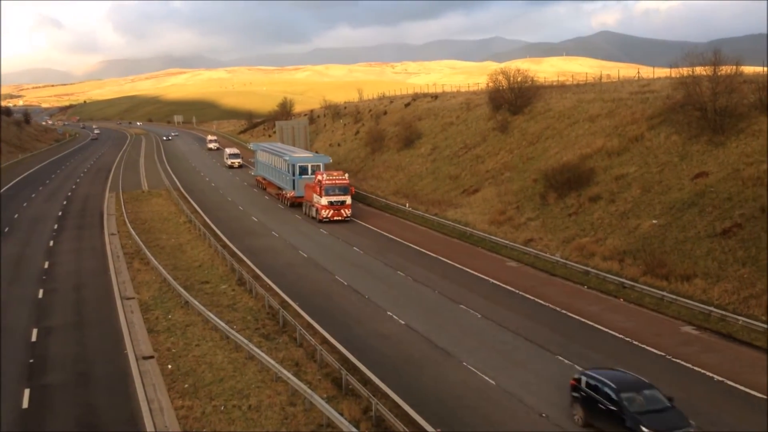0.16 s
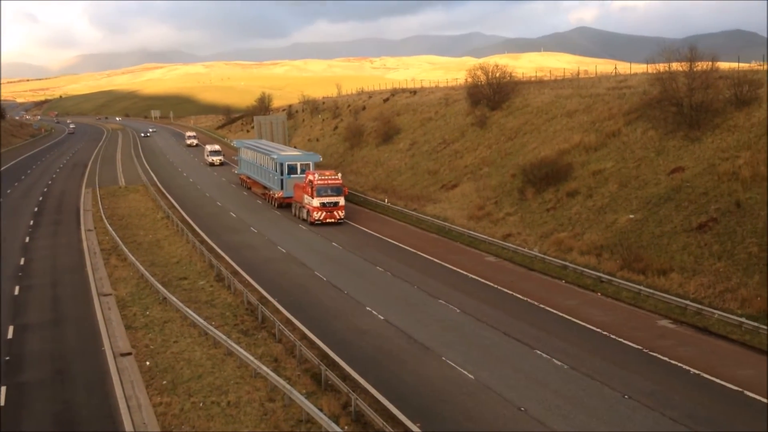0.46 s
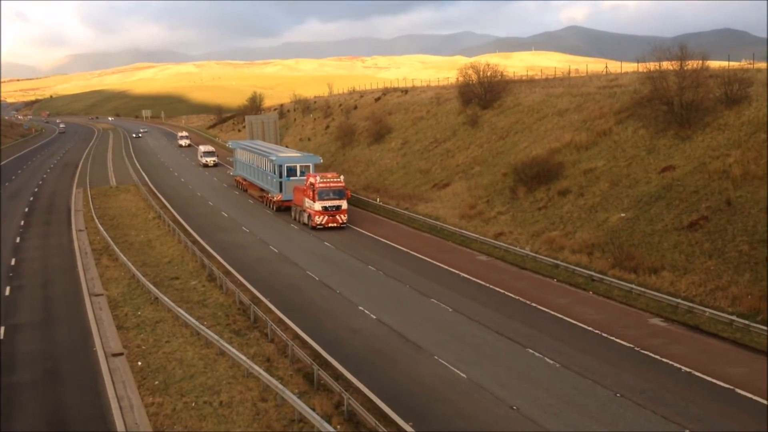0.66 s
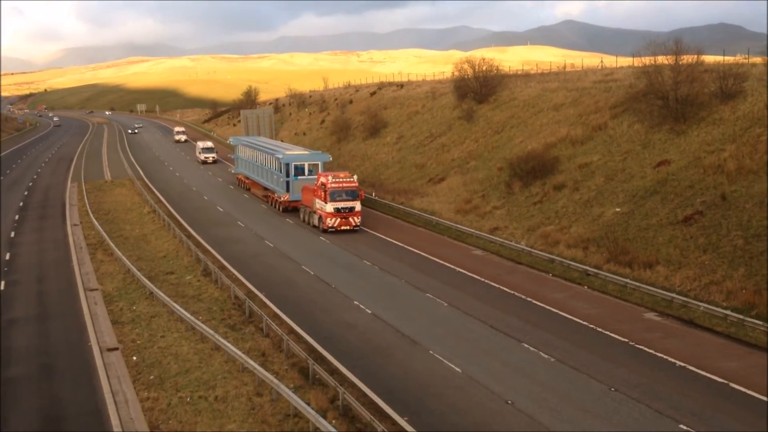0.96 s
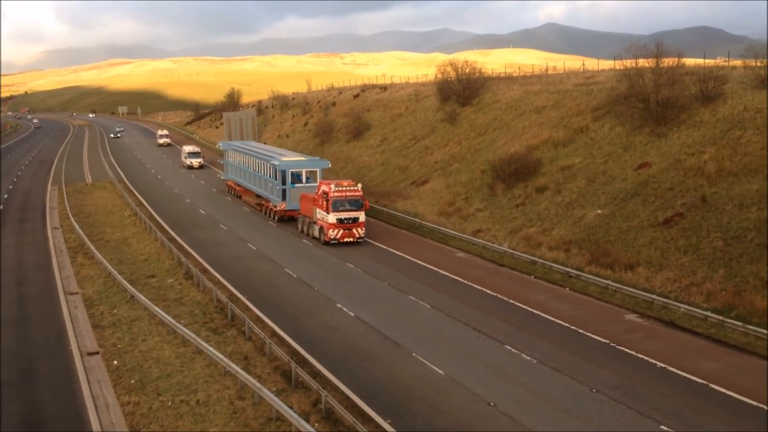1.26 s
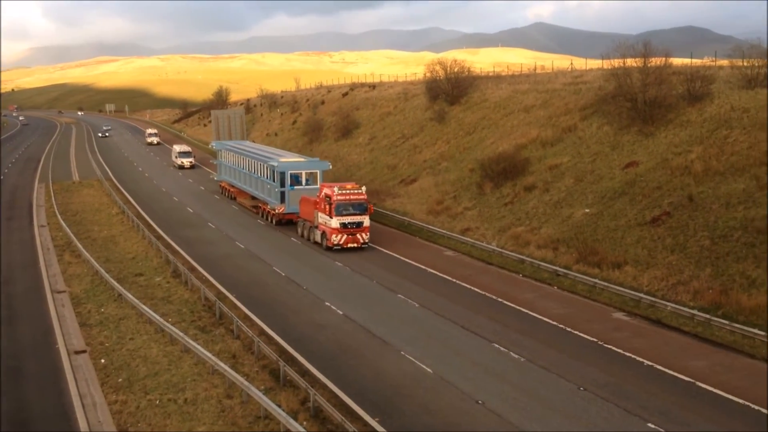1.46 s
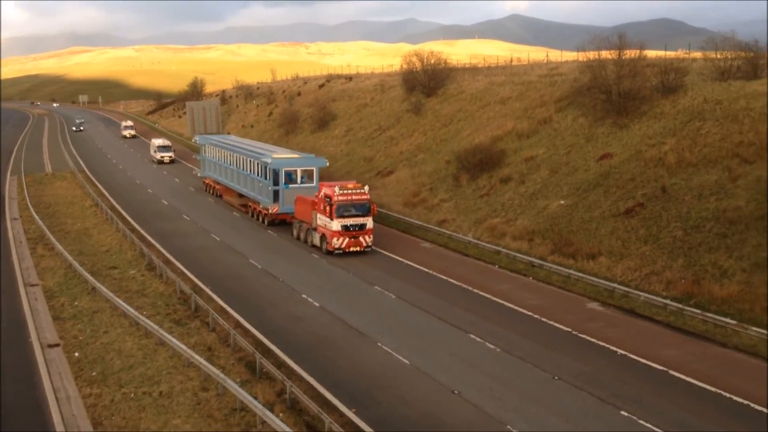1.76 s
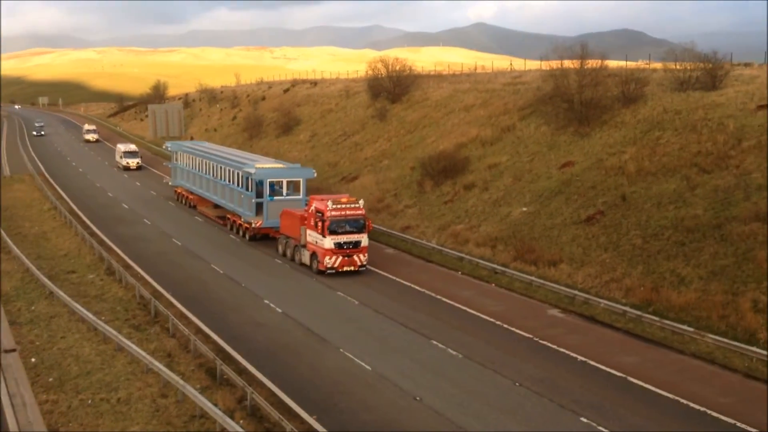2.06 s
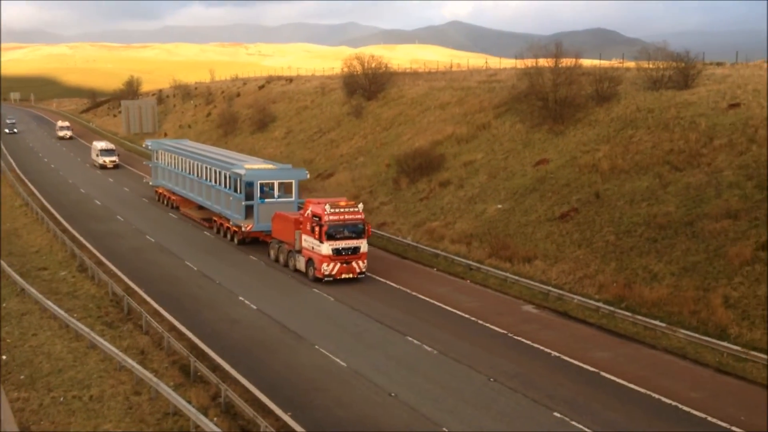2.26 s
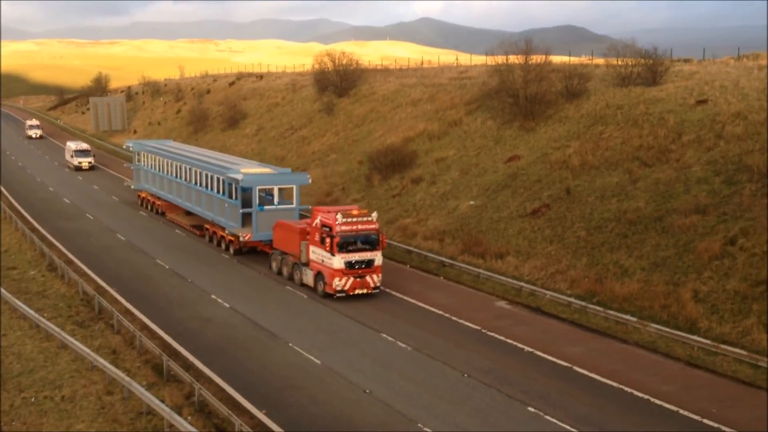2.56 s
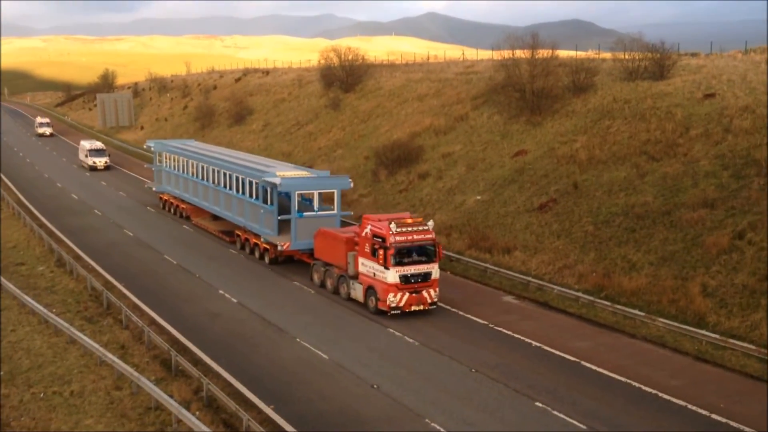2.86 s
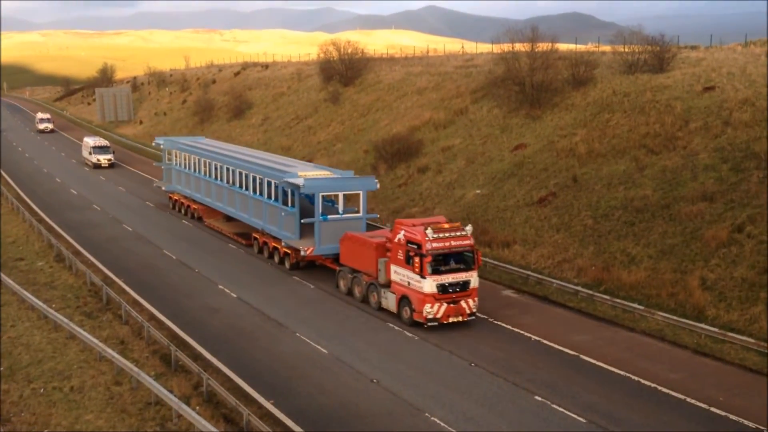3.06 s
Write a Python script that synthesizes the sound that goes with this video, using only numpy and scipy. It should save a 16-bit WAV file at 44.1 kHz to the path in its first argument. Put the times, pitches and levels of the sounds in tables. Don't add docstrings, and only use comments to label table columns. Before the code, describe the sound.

Two-tone truck horn blast on a motorway, between a car rushing past and the truck rumbling nearer

```python
import sys
import numpy as np
from scipy import signal
from scipy.fft import rfft, irfft, next_fast_len
from scipy.io import wavfile
from scipy.ndimage import uniform_filter1d, map_coordinates

SR = 44100
rng = np.random.default_rng(int(sys.argv[2]) if len(sys.argv) > 2 else 0)


def rack_gain(trim_db):
    fader = np.asarray(trim_db, float)
    return 10 ** (fader / 20)


def transcribe(u):
    v = np.clip(np.atleast_2d(u).T, -1, 1)
    q = np.round(v * 32767).astype(np.int16)
    wavfile.write(sys.argv[1], SR, q)


N = 142002

# time_s, level_db, deck_screening_0_to_1
CAR_PASS = [
    (0, -17.5, 0.1),
    (.3, -18.5, 0.02),
    (.55, -17.5, 0.09),
    (.7, -19.5, 0.1),
    (0.878, -21, 0.26),
    (1.0, -22, 0.73),
    (1.2, -27.5, 0.21),
    (1.5, -24, 0.6),
    (2.2, -39.5, 0.8),
]
# freq_hz, density_db
CAR_TYRE_SPECTRUM = [(90, -36), (300, -22.5), (600, -3.5), (1000, 1.2), (1600, -2.5), (2800, -24),
                     (7000, -26), (15000, -51)]
# centre_s, centre_hz, half_length_s, gain_db
TYRE_SWELLS = [(.13, 1150, .04, 4), (.25, 800, .06, 2), (.33, 1000, .04, -2), (.45, 820, .05, 4.5),
               (.63, 930, .07, 4.5), (.72, 850, .03, 3), (.82, 800, .05, 2.5), (.55, 1500, .14, -3),
               (.85, 1150, .08, -2.5), (.15, 4400, .12, 2.5), (.52, 4200, .1, 3), (.4, 3100, .13, -4),
               (.1, 2600, .08, 3)]
# time_s, nearness_db
TRUCK_NEARNESS = [(0, -5.5), (.6, -4), (1.0, -8), (1.3, -9.5), (1.6, -6.5), (1.9, 0.5), (2.2, -1.5),
                  (2.5, 1), (2.8, 3.5), (3.0, 6), (3.12, 6.5), (3.22, 5)]
# freq_hz, density_db
RUMBLE_SPECTRUM = [(25, -54), (65, -28), (80, -17.5), (120, -10), (200, 4), (300, -5.5), (450, -32),
                   (700, -52.5)]
# freq_hz, density_db
ROAR_SPECTRUM = [(150, -42), (350, -8.5), (580, 2.2), (1000, -4), (1600, -10.5), (2500, -17.5), (4000, -55),
                 (6000, -77)]
# freq_hz, density_db
HISS_SPECTRUM = [(1200, -26.5), (2200, 0), (3500, 2.5), (5500, -3.5), (8000, -8), (11000, -21.5),
                 (15000, -44)]
# time_s, pitch_hz
ENGINE_PITCH = [
    (0, 197.3),
    (1.0, 192.3),
    (1.8, 189.7),
    (2.2, 197.4),
    (2.6, 209.7),
    (3.0, 216),
    (3.22, 218.4),
]
# multiple, level_db
HIGH_PARTIALS = [(1, -14), (2, -28), (3, -8), (4, -8), (5, -2.5), (6, 2), (7, -8), (8, -13), (9, -26),
                 (10, -16), (11, -12.5), (12, -20), (13, -24.5), (14, -33)]
# multiple, level_db
LOW_PARTIALS = [(3, -19.5), (4, -13), (5, -13), (6, -14), (7, -30), (8, -17), (9, -18), (10, -22),
                (11, -22)]
# multiple, centre_s, half_length_s, gain_db
PARTIAL_FADES = [(3, 1.39, .05, -5), (3, 1.81, .04, 3), (4, 1.42, .07, 3), (4, 1.79, .05, -6),
                 (5, 1.52, .08, 2), (5, 1.755, .028, -12), (5, 1.81, .03, 1.5), (6, 1.41, .04, 1),
                 (6, 1.6, .09, -3), (7, 1.4, .035, 5), (7, 1.51, .05, -3), (7, 1.79, .05, 2),
                 (8, 1.39, .03, -4), (8, 1.52, .04, -7), (10, 1.6, .03, -5), (11, 1.44, .05, 2),
                 (11, 1.655, .04, -14), (12, 1.55, .03, 3), (13, 1.64, .03, -7)]
# freq_hz, density_db
JET_SPECTRUM = [(2500, -27), (4500, -1.5), (6500, 4), (8200, -10), (10500, -14), (13000, -24)]
# freq_hz, t60_s
BANK_DECAY = [(300, .3), (800, .17), (1100, .09), (1500, .1), (2100, .2), (4000, .04)]
# start_s, start_hz, end_s, end_hz, gain_db
PARAPET_NOTCHES = [(.05, 12400, .4, 10900, -9), (.1, 7300, .6, 5700, -4), (.3, 3400, .55, 2800, -8),
                   (.55, 2800, .78, 2600, -5), (.87, 5000, 1, 4950, -7), (2.2, 5000, 2.5, 5000, -6),
                   (0, 7800, .45, 6300, -4), (2.04, 2000, 2.2, 1300, -4), (.58, 13200, .95, 11800, -8),
                   (1.4, 8700, 1.85, 8500, -5), (1.89, 3700, 2.04, 2200, -10)]
# start_s, peak_db, pitch_hz
CAMERA_TICKS = [(1.824, -34, 8960), (1.86, -30, 6020), (1.8658, -25.5, 11800), (1.8697, -19.5, 6800),
                (1.87, -26, 4030), (1.869, -26, 13000), (2.14, -44, 5500), (2.15, -42, 6500),
                (1.902, -40.5, 4400), (1.874, -24.5, 4100), (1.8795, -37, 9850), (1.883, -33.5, 7000),
                (1.912, -41, 8000), (2.187, -28.5, 7500), (2.288, -35.5, 6000)]
# start_s, pitch_hz, peak_db, t60_s
CAMERA_THUMPS = [
    (2.255, 140, -21, .15),
    (2.31, 120, -24, .1),
    (3.008, 130, -20, .12),
    (2.43, 200, -19, .12),
    (2.89, 170, -19, .12),
    (3.012, 220, -17, .08),
    (3.01, 345, -11, .075),
    (3.18, 180, -14, .15),
    (3.198, 265, -11, .15),
]
# time_s, pitch_hz, level_db
STRAP_SQUEAKS = [
    [(2.134, 4590, -67), (2.14, 5500, -50), (2.145, 6800, -62), (2.15, 5400, -35), (2.157, 4370, -27.5),
     (2.166, 3500, -32), (2.178, 4200, -35), (2.192, 4500, -44), (2.2, 4600, -65)],
    [(2.158, 4900, -55), (2.166, 5500, -34), (2.18, 5850, -30), (2.189, 6300, -28.5), (2.196, 6500, -30),
     (2.2, 6300, -43), (2.215, 6300, -48), (2.225, 6300, -65)],
]
# centre_hz, width_hz, gain_db
MIC_RESONANCES = [
    (205, 36, -0.5),
    (414, 52, -2.5),
    (4450, 360, 5.5),
    (4900, 240, -7.5),
    (10400, 710, 3),
]
# centre_s, corner_hz, length_s, gain_db
DROPOUTS = [(.748, 2300, .016, -22), (1.005, 2600, .012, -25), (1.175, 2700, .012, -22),
            (1.249, 2650, .03, -70), (1.335, 2200, .031, -60), (1.625, 2800, .012, -18),
            (1.855, 5500, .016, -20), (2.007, 2100, .012, -17), (2.018, 4800, .008, -10),
            (2.134, 1900, .009, -18), (2.145, 5000, .005, -8), (2.71, 2300, .02, -16)]
# centre_s, pitch_hz, peak_db
DROPOUT_LINES = [(.748, 3251, -45), (.748, 4328, -43), (.748, 4629, -45), (1.172, 3251, -51),
                 (1.172, 4457, -56), (1.245, 2680, -48), (1.255, 4112, -53), (1.255, 4414, -53),
                 (1.33, 4700, -57), (1.335, 4328, -56), (1.338, 4511, -55), (1.338, 6503, -59),
                 (1.852, 5867, -53), (2.007, 3251, -45), (2.007, 4037, -46), (2.007, 6083, -54),
                 (2.13, 2497, -47), (2.13, 2939, -48), (2.13, 3789, -48), (2.13, 4112, -48),
                 (2.71, 3434, -41), (2.71, 3800, -45), (2.71, 4608, -49)]

HORN_ON_S, HORN_OFF_S, ATTACK_S = 1.3534, 1.812, 0.0355


def unit(x):
    return x / np.sqrt(np.mean(x ** 2) + 1e-20)


def bump(x):
    return np.exp(-x ** 2)


def along(points, hz):
    f, v = np.transpose(points)
    return np.interp(np.log(hz + 1), np.log(f + 1), v)


def curves(rows):
    s, *cols = np.transpose(rows)
    return [np.interp(np.arange(N) / SR, s, c) for c in cols]


def wobble(rate_hz):
    knots = rng.standard_normal(int(N * 100 / SR) + 4)
    return map_coordinates(knots, [np.arange(N) * min(rate_hz, 99) / SR])


def shaped(x, gain):
    hz, t, z = signal.stft(x, SR, nperseg=256, noverlap=192)
    return signal.istft(z * gain(hz[:, None], t[None]), SR, nperseg=256, noverlap=192)[1][:N]


def filtered(x, response):
    m = next_fast_len(N + SR // 2)
    return irfft(rfft(x, m) * response(np.fft.rfftfreq(m, 1 / SR)), m)[:N]


def rush(spectrum, patchy_db):
    z = signal.stft(rng.standard_normal(N), nperseg=512)[2]
    field = uniform_filter1d(rng.standard_normal(z.shape), size=5, axis=0)
    field = uniform_filter1d(field, size=10, axis=1)
    x = signal.istft(z * rack_gain(patchy_db * unit(field)), nperseg=512)[1][:N]
    return unit(filtered(x, lambda hz: rack_gain(along(spectrum, hz))))


def car():
    time_s, level_db, screening = np.transpose(CAR_PASS)
    doppler_db, doppler_s, doppler_width_s = 1.5, 0.18, 0.057
    swell_octaves = .28
    screen_hz, screen_db_per_octave = 2500, 11.5

    def path(hz, t):
        tilt = np.clip(np.log2((hz + 1) / 1100), -.6, .6) * (hz < 2400)
        db = np.interp(t, time_s, level_db)
        db = db - doppler_db * np.tanh((t - doppler_s) / doppler_width_s) * tilt
        for centre_s, centre_hz, half_s, gain_db in TYRE_SWELLS:
            octaves = np.log2((hz + 1) / centre_hz)
            db = db + gain_db * bump((t - centre_s) / half_s) * bump(octaves / swell_octaves)
        screen = np.interp(t, time_s, screening)
        return rack_gain(db - screen_db_per_octave * screen * np.log2(1 + hz / screen_hz))

    sway_db = .6 * wobble(12.87)
    return rack_gain(sway_db) * shaped(rush(CAR_TYRE_SPECTRUM, patchy_db=0.7), path)


def truck():
    near_db, = curves(TRUCK_NEARNESS)
    pitch_hz, = curves(ENGINE_PITCH)
    pitch_hz = pitch_hz * (1 + .012 * wobble(25))
    drone = np.sin(2 * np.pi * np.cumsum(pitch_hz) / SR)
    drone = rack_gain(-32 + 2 * wobble(5.66)) * drone
    rumble = rack_gain(-28.5 + 1.1 * wobble(6.98)) * rush(RUMBLE_SPECTRUM, patchy_db=-0.4)
    roar_db = -27.5 + 0.47 * near_db + 0.31 * wobble(8.6)
    hiss_db = -43 + near_db + 2.0 * wobble(8.58)
    roar = rack_gain(roar_db) * rush(ROAR_SPECTRUM, patchy_db=1)
    hiss = rack_gain(hiss_db) * rush(HISS_SPECTRUM, patchy_db=1.5)
    return rack_gain(0.75 * near_db) * (rumble + drone) + roar + hiss


def trumpet(pitch_hz, partials, t, fades=()):
    start_sharp, fading_db, leak_db = 0.01524, 1.2, -12
    sharp = start_sharp * np.exp(-abs(t - HORN_ON_S) / ATTACK_S)
    turns = np.cumsum(pitch_hz * (1 + sharp + 0.0023 * wobble(30.34))) / SR
    tone = np.zeros(N)
    for k, level_db in partials:
        db = level_db + 2.5 + fading_db * wobble(21.77)
        for multiple, centre_s, half_s, gain_db in fades:
            if multiple == k:
                db = db + gain_db * bump((t - centre_s) / half_s)
        tone += rack_gain(db) * np.sin(2 * np.pi * k * turns - 0.132 * k * k)
    envelope = [(k * pitch_hz, db) for k, db in partials]
    puffs = rng.standard_normal(N) * (1 + np.cos(2 * np.pi * turns))
    leak = filtered(puffs, lambda hz: rack_gain(along(envelope, hz)) * (hz < 3000) * (hz > 400))
    return tone + rack_gain(leak_db) * unit(leak) * np.std(tone)


def bank_echo(dry):
    delay_s, level_db = .03, -15
    hz, t, z = signal.stft(rng.standard_normal(SR // 2), SR, nperseg=256)
    decay = rack_gain(-60 * t / along(BANK_DECAY, hz)[:, None])
    tail = signal.istft(z * decay, SR, nperseg=256)[1]
    delayed = np.pad(dry, (round(delay_s * SR), 0))
    return rack_gain(level_db) * signal.fftconvolve(delayed, tail / np.linalg.norm(tail))[:N]


def horn():
    level_db, surge_db, surge_s = -20, 1.5, 1.697
    release_s, linger_s, linger_hz = 0.014, .055, 1030
    t = np.arange(N) / SR
    shut_s = np.clip(t - HORN_OFF_S, 0, 9)
    pressure = rack_gain(level_db + surge_db / (1 + np.exp(-(t - surge_s) / .015)))
    pressure = pressure * np.clip((t - HORN_ON_S) / ATTACK_S, 0, 1) ** 2
    high = trumpet(187.9, HIGH_PARTIALS, t, PARTIAL_FADES)
    low = trumpet(157.4, LOW_PARTIALS, t)
    jet = rack_gain(-27) * rush(JET_SPECTRUM, patchy_db=-3.0)
    blown = pressure * (high + low + jet)
    lingering = filtered(blown, lambda hz: hz < linger_hz)
    dry = (blown - lingering) * rack_gain(-20 * shut_s / release_s)
    dry = dry + lingering * rack_gain(-20 * (shut_s / linger_s) ** 2)
    return dry + bank_echo(dry)


def parapet(x):
    width = .055

    def cut(hz, t):
        db = 0
        for start_s, start_hz, end_s, end_hz, gain_db in PARAPET_NOTCHES:
            centre_hz = np.interp(t, [start_s, end_s], [start_hz, end_hz])
            active = (t > start_s) & (t < end_s)
            db = db + gain_db * active * bump((hz / centre_hz - 1) / width)
        return rack_gain(db)

    return shaped(x, cut)


def squeak(rows):
    pitch_hz, level_db = curves(rows)
    rough = filtered(rng.standard_normal(N), lambda hz: hz < 800)
    scrape = filtered(rng.standard_normal(N), lambda hz: (hz > 3000) / (1 + (hz / 7300) ** 10))
    whistle = (0.84 + 0.85 * unit(rough)) * np.sin(2 * np.pi * np.cumsum(pitch_hz) / SR)
    return rack_gain(level_db) * (level_db > -59) * (whistle + rack_gain(-7) * unit(scrape))


def handling():
    tick_t60_s, tick_db, rattle_t60_s, rattle_db = .003, 1.5, 0.039, -18.5
    thump_rise_s, thump_db = .005, 4.5
    out, t = np.zeros(N + SR), np.arange(SR // 4) / SR
    for start_s, peak_db, pitch_hz in CAMERA_TICKS:
        grit = np.convolve(rng.standard_normal(len(t)), [0.47, .5, -0.29, -0.45], "same")
        click = rack_gain(-60 * t / tick_t60_s) * (np.sin(2 * np.pi * pitch_hz * t) + .5 * grit)
        rattle = rack_gain(rattle_db - 60 * t / rattle_t60_s) * grit
        out[round(start_s * SR):][:len(t)] += rack_gain(peak_db + tick_db) * (click + rattle)
    for start_s, pitch_hz, peak_db, t60_s in CAMERA_THUMPS:
        envelope = rack_gain(peak_db + thump_db - 60 * t / t60_s) * (1 - np.exp(-t / thump_rise_s)) ** 2
        out[round(start_s * SR):][:len(t)] += envelope * np.sin(2 * np.pi * pitch_hz * t)
    contact = out[:N] + sum(squeak(rows) for rows in STRAP_SQUEAKS)
    return filtered(contact, lambda hz: 1 / (1 + (hz / 15000) ** 4))


def scene():
    return (parapet(car() + truck() + horn()) + handling())[None]


def microphone(x):
    shelf_hz, shelf_db = 4890, -4.5

    def colour(hz):
        db = shelf_db / (1 + np.exp(np.clip((shelf_hz - hz) / 40, -50, 50)))
        for centre_hz, width_hz, gain_db in MIC_RESONANCES:
            db = db + gain_db / (1 + (2 * (hz - centre_hz) / width_hz) ** 2)
        return rack_gain(db)

    return filtered(x, colour)


def dropouts(x):
    line_half_s = .019

    def holes(hz, t):
        db = 0
        for centre_s, corner_hz, length_s, gain_db in DROPOUTS:
            above = np.clip((hz - corner_hz) / 300, 0, 1)
            db = db + gain_db * above * np.clip(2 - 4 * abs(t - centre_s) / length_s, 0, 1)
        return rack_gain(db)

    out = shaped(x, holes)
    t = np.arange(N) / SR
    for centre_s, pitch_hz, peak_db in DROPOUT_LINES:
        envelope = np.clip(2 - 2 * abs(t - centre_s) / line_half_s, 0, 1)
        out = out + rack_gain(peak_db) * envelope * np.sin(2 * np.pi * pitch_hz * t)
    return out


def band_limit(x):
    return signal.sosfilt(signal.butter(12, 15250, fs=SR, output="sos"), x)


def record(dry):
    heard = dropouts(microphone(dry[0]))
    mix = filtered(heard, lambda hz: hz < 15200)[None]
    return band_limit(mix)


dry = scene()
out = record(dry)
transcribe(out)
```